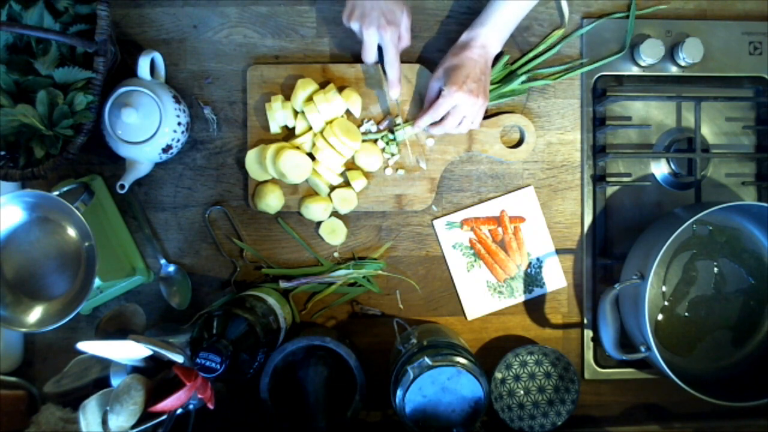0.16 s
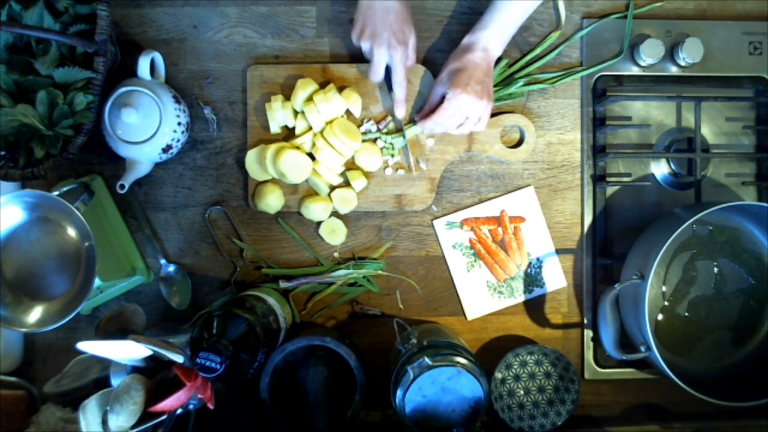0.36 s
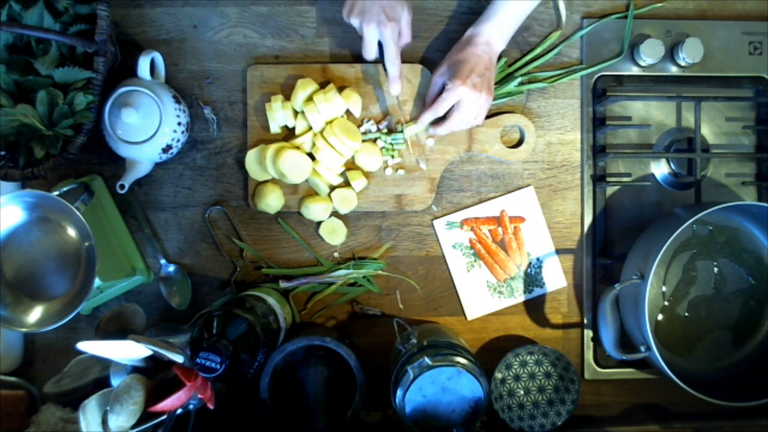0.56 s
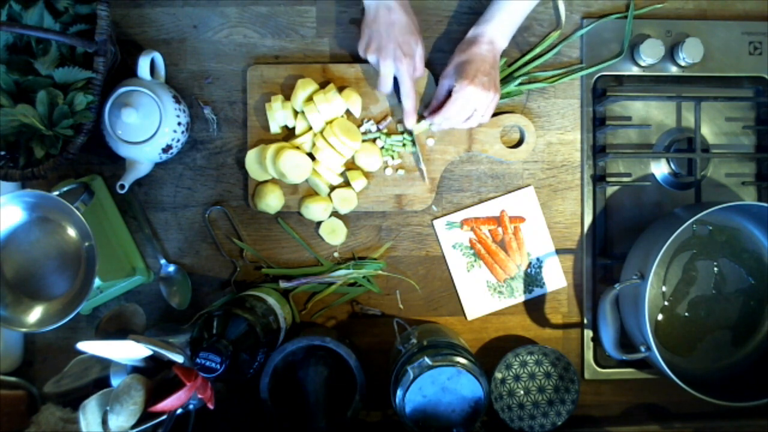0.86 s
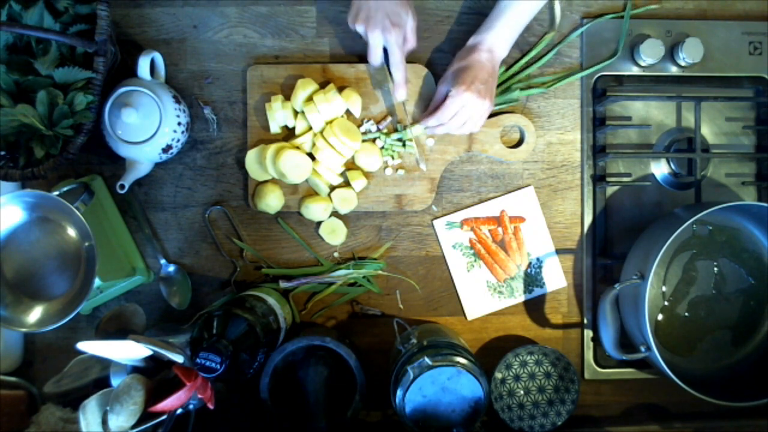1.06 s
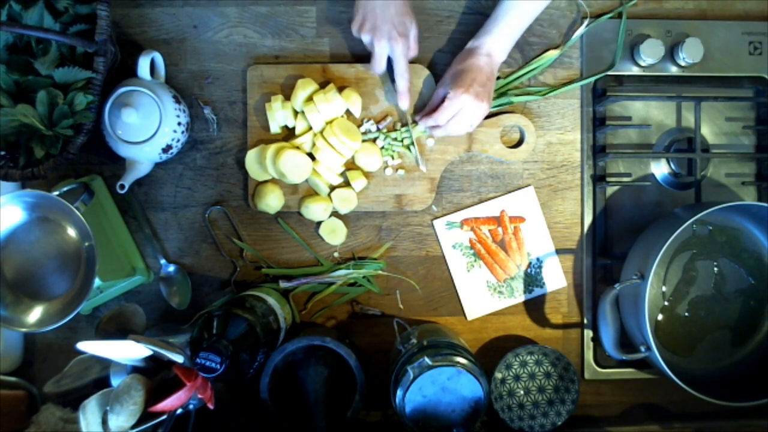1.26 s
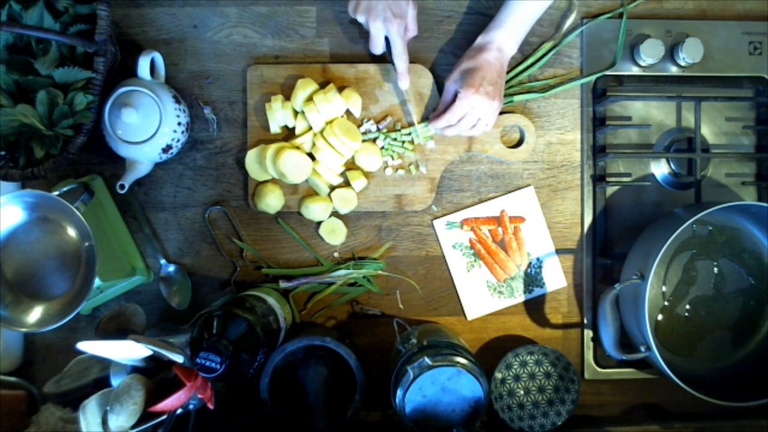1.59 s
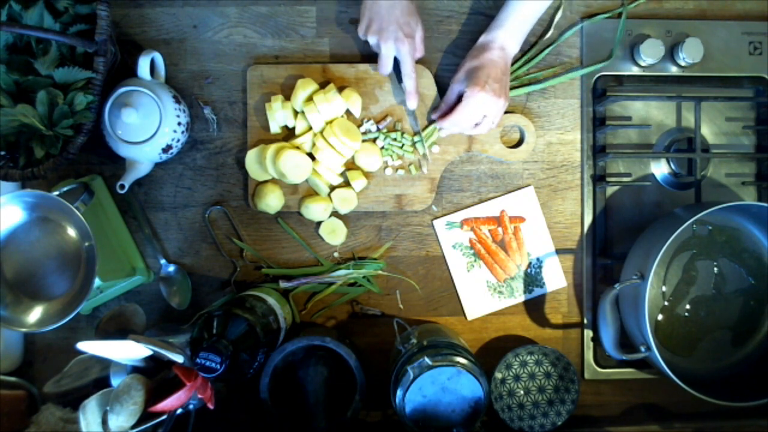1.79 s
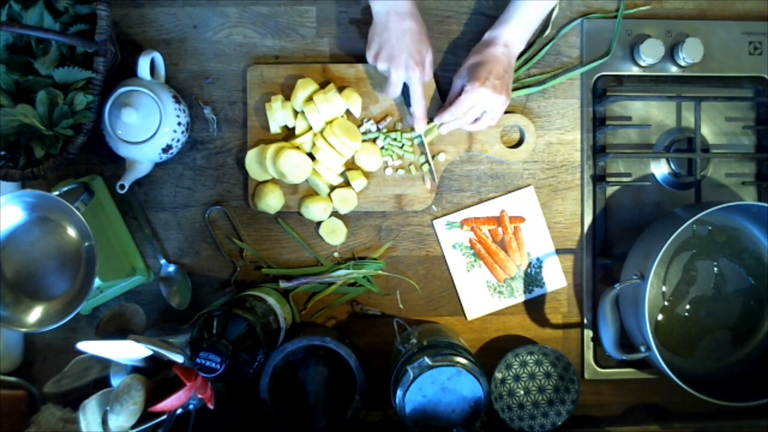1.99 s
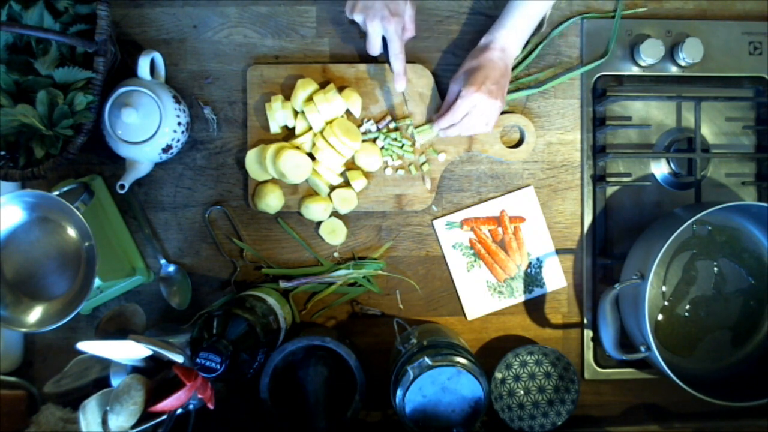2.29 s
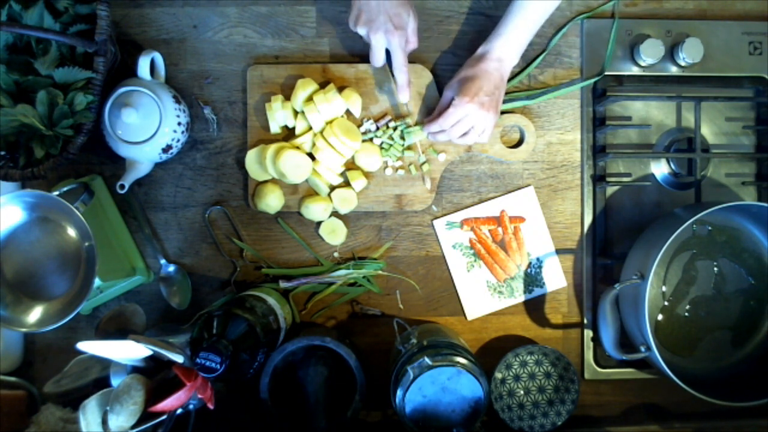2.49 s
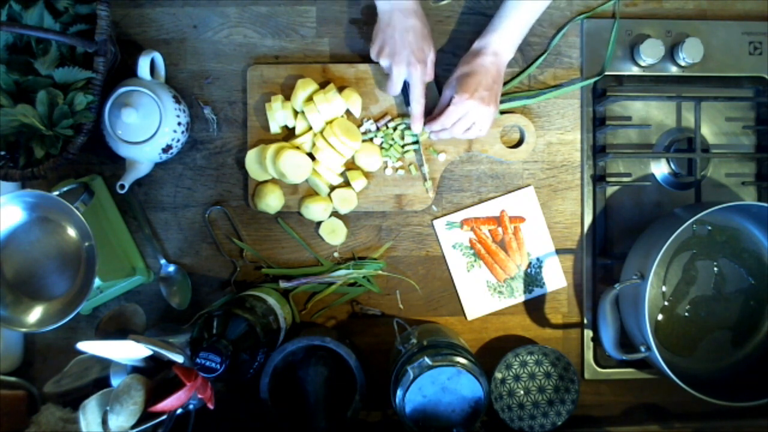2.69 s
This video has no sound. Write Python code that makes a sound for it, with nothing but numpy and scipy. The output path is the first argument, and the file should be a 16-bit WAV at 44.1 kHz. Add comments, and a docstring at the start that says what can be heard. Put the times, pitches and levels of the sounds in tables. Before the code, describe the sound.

Knife slicing through fresh green stalks on a wooden cutting board, knocking early, lighter crunches later

```python
"""A kitchen knife cuts through garlic greens on a wooden board: bursts of tiny clicks crunch, snap and squash.
The first three strokes end in a loud knock, an impulse through the board's tones; the later ones are light.
Once, between strokes, the blade pings in steel modes; it also slides with faint gliding notes.
Twice, before the ping and again near the end, its edge drags over the wood in grainy scrapes and squeaks.
The place is small and hard-walled, with more room than direct sound, over filtered noise, hum and whine."""
import sys
import numpy as np
from scipy import signal
from scipy.fft import rfft, irfft
from scipy.io import wavfile
from scipy.ndimage import uniform_filter1d

SR = 44100
rng = np.random.default_rng(int(sys.argv[2]) if len(sys.argv) > 2 else 0)


def unload_wav(signal):
    """Save mono or channel-first audio to the path in sys.argv[1] as 16-bit WAV at rate SR, clipped to [-1, 1]."""
    wavfile.write(
        sys.argv[1],
        SR,
        np.round(np.clip(np.atleast_2d(signal).T, -1, 1) * 32767).astype(np.int16),
    )


N = 125685  # samples


def amp(db):
    """Decibels to gain."""
    return 10 ** (np.asarray(db) / 20)


def unit(x):
    """Scales to an energy of one."""
    return x / np.sqrt(np.sum(x ** 2) + 1e-20)


def read(points, hz):
    """Reads a table on a log-frequency axis."""
    f, value = np.transpose(points)
    return np.interp(np.log(hz + 1), np.log(f + 1), value)


def add(mix, start_s, sound):
    """Mixes a sound in at a time, cut off at the end of the mix."""
    part = mix[max(round(start_s * SR), 0):][:len(sound)]
    part += sound[:len(part)]


def through(x, response):
    """Convolves, keeping the length."""
    return signal.fftconvolve(x, response)[:len(x)]


def swell(t, rise_s):
    """Smooth start from zero to one."""
    return np.sin(np.pi / 2 * np.minimum(t / rise_s, 1)) ** 2


def colour(points, size=4096):
    """Causal minimum-phase filter of unit energy with the given spectrum."""
    hz = abs(np.fft.fftfreq(size, 1 / SR))
    log_gain = np.log(amp(read(points, hz)))
    spectrum = np.exp(np.conj(signal.hilbert(log_gain)))
    return unit(np.fft.ifft(spectrum).real[:size // 2])


def modes(table):
    """Dying sines of a struck object, in alternating sign."""
    t = np.arange(SR // 2) / SR
    total = np.zeros(len(t))
    for k, (hz, db, t60) in enumerate(table):
        total += (-1) ** k * amp(db - 60 * t / t60) * np.sin(2 * np.pi * hz * t)
    return unit(total)


def blows(rows):
    """One impulse per (start_s, level_db), scaled as if a unit-energy response filled 40 ms."""
    out = np.zeros(N)
    for start_s, db in rows:
        add(out, start_s, amp([db]) * np.sqrt(.04 * SR))
    return out


FIBRE_RATE_PER_S, FIBRE_SIZE_DB = 2500, 4.5  # size: scale of the uneven click levels
BITE_SHARE, RELEASE_S = 0.16, .004  # rise as a share of the length; decay time constant


def grains(rows):
    """Bursts of tiny clicks of uneven size, one burst per (start_s, length_s, level_db)."""
    t, out = np.arange(SR // 6) / SR, np.zeros(N)
    for start_s, length, db in rows:
        chance, size, sign = rng.random((3, len(t)))
        size_gain = amp(-FIBRE_SIZE_DB * np.log(size + np.exp(-4)))
        clicks = (chance < FIBRE_RATE_PER_S / SR) * np.sign(sign - .5) * size_gain
        bite = np.minimum(t / (BITE_SHARE * length), 1)
        release = np.exp(-np.maximum(t - length, 0) / RELEASE_S)
        add(out, start_s, amp(db) * np.sqrt(length * SR) * unit(clicks * bite * release))
    return out


# hiss colour: frequency_hz, relative density_db (per Hz)
HISS_COLOUR = [(25, 7), (60, 4.5), (120, -11), (300, -3.5), (1000, -9.5), (2400, -12), (4000, -11.5),
               (7000, -15), (14000, -27.5)]
HISS_DB = -70.5  # before the low cut and band limit
# mains hum and thin electrical whine, before the low cut: pitch_hz, level_db
HUM_TONES = [(50, -64), (1260, -88), (3325, -77.5), (4673, -86.5), (8000, -82), (11326, -87.5),
             (12672, -91.5), (13291, -92.5)]


def background():
    """Steady floor at the microphone: coloured noise as faint hiss, sines as hum and whine."""
    t = np.arange(N) / SR
    tones = np.zeros(N)
    for hz, db in HUM_TONES:
        tones += amp(db) * np.sqrt(2) * np.sin(2 * np.pi * (hz * t + rng.random()))
    hiss = through(rng.standard_normal(N), colour(HISS_COLOUR))
    return tones + amp(HISS_DB) * hiss


# decay of the room, before its spectrum is evened and its end faded: frequency_hz, t60_s
ROOM_DECAY = [(100, 0.27), (400, 0.2), (1000, 0.29), (2000, 0.28), (3200, 0.28), (7000, 0.2), (14000, 0.28)]
EARLY_S, EARLY_LIFT_DB, EARLY_STEP_DB = .041, 3, 5  # gain rises through the early echoes, then drops
DIRECT_DB = -8  # direct sound against the whole of the echoes


def room():
    """Direct sound, an even cluster of early echoes, and a weaker tail that dies band by band."""
    t = np.arange(SR // 2) / SR
    hz, at, noise = signal.stft(rng.standard_normal(len(t)), SR, nperseg=256)
    decay = amp(-60 * at / read(ROOM_DECAY, hz)[:, None])
    echoes = signal.istft(noise * decay, SR, nperseg=256)[1][:len(t)]
    step = amp(np.where(t < EARLY_S, EARLY_LIFT_DB * t / EARLY_S, EARLY_LIFT_DB - EARLY_STEP_DB))
    fade = np.clip((.35 - t) * 8, 0, 1)  # silent from 0.35 s
    for _ in range(3):  # even out the spectrum
        power = uniform_filter1d(abs(rfft(echoes * step)) ** 2, size=24)
        echoes = irfft(rfft(echoes) / np.sqrt(power), len(t)) * fade
    return unit(unit(echoes * step) + amp(DIRECT_DB) * (t == 0))


# flat of the blade slides lightly, before the room: start_s, length_s, start_hz, end_hz, level_db
STEEL_SLIDES = [(0.484, 0.046, 3910, 3607, -70.5), (1.345, 0.083, 3960, 3820, -64),
                (2.198, 0.086, 3930, 3440, -67)]
SLIDE_WAVER_HZ = 110  # rms


def slides(space):
    """Sliding steel sings a faint falling note whose pitch wavers at random."""
    out = np.zeros(N)
    for start_s, length, start_hz, end_hz, db in STEEL_SLIDES:
        u = np.minimum(np.arange(SR // 6) / SR / length, 1)  # progress, 0 to 1
        slow_noise = uniform_filter1d(rng.standard_normal(len(u)), size=100)
        waver = unit(slow_noise) * np.sqrt(len(u))
        pitch_hz = start_hz + (end_hz - start_hz) * u + SLIDE_WAVER_HZ * waver
        turns = np.cumsum(pitch_hz) / SR
        envelope = np.sin(np.pi * np.sqrt(u))
        add(out, start_s, 2 * amp(db) * envelope * np.sin(2 * np.pi * turns))
    return through(out, space)


# blade is touched and rings: start_s, level_db (of the direct ring)
BLADE_PINGS = [(2.3155, -37)]
# modes of the blade: pitch_hz, relative level_db, t60_s
BLADE_MODES = [(1163, -27, .2), (1655, -22, .28), (2192, -8, .26), (2695, -11, .17), (2955, -7, .14),
               (3140, -14, .22), (3650, -11, .12), (4005, -4, .14), (4054, -5, .14), (4150, 1, .28),
               (4283, -1, .15), (4466, -7, .14), (4750, -14, .12), (6153, -19, .2), (7260, -23, .17)]
PING_RISE_S, PING_ROOM_DB = .002, 1  # room level against the direct ring
PING_FIRST_SHARE = .06  # share of each mode's t60 that feeds the room


def blade(space):
    """A touch on the steel: the blade rings in its modes, and its first moment fills the room."""
    rise = swell(np.arange(len(space)) / SR, PING_RISE_S)
    first = rise * modes([(hz, db, t60 * PING_FIRST_SHARE) for hz, db, t60 in BLADE_MODES])
    direct = unit(rise * modes(BLADE_MODES))
    in_room = unit(through(first, space))
    return through(blows(BLADE_PINGS), direct + amp(PING_ROOM_DB) * in_room)


# blade drags over the wood: start_s, length_s, scrape_db, squeak_db
WOOD_DRAGS = [(1.855, 0.086, -85, -59), (1.927, 0.041, -54, -43.5), (1.956, 0.017, -61, -38.5),
              (2.002, 0.03, -43, -42), (2.658, 0.046, -43, -68), (2.687, 0.059, -38, -41),
              (2.77, 0.075, -48.5, -70), (2.82, 0.052, -39.5, -61)]
# colour of the scrape: frequency_hz, relative level_db
SCRAPE_COLOUR = [(60, -56), (300, -34), (480, -5), (680, 8), (900, -5), (1300, 2.5), (1900, -3.5),
                 (2800, -0.5), (4000, -11.5), (6000, -17), (9000, -27), (14000, -44)]
# colour of the squeak: frequency_hz, relative level_db
SQUEAK_COLOUR = [(60, -42.5), (500, -34), (900, -11.5), (1080, 12), (1200, -6), (1330, 6.5), (1700, -26),
                 (2100, -31), (3500, -8.5), (14000, -40.5)]


def drags(space):
    """The edge sticks and slips over the wood: grainy clicks, coloured as scrape and dull squeak."""
    scrape = grains([(s, length, db) for s, length, db, _ in WOOD_DRAGS])
    squeak = grains([(s, length, db) for s, length, _, db in WOOD_DRAGS])
    dragged = through(scrape, colour(SCRAPE_COLOUR)) + through(squeak, colour(SQUEAK_COLOUR))
    return through(dragged, space)


# broad resonances of the board, before the room: pitch_hz, relative level_db, t60_s
BOARD_MODES = [(165, -24.5, 0.024), (313, -19.5, 0.016), (396, -14, 0.017), (427, -7.5, 0.012),
               (659.7, -3.5, 0.029), (872, -10, 0.049), (1060, 1.5, 0.014), (1380, 1, 0.015),
               (1503, -7.5, 0.048), (1683, -2.5, 0.0087), (2027, -7, 0.037), (2220, -14, 0.036),
               (2600, -22, .025)]
# colour of the blade's contact with the wood: frequency_hz, relative level_db
CONTACT_COLOUR = [(40, -30), (120, -12.5), (250, 8), (500, 5.5), (1000, 6.5), (2100, 1.5), (2600, -4),
                  (4500, -14.5), (14000, -65)]
# lasting ring of board and counter: pitch_hz, relative level_db
RING_TONES = [(370, -13), (450, -7), (606, -6), (634, -5), (668, 0), (713, -4), (862, -8), (950, -6),
              (1027, -2), (1078, -1), (1135, -5), (1220, -1), (1274, -3), (1304, -4), (1354, -3),
              (1390, -8), (1431, -7), (1514, -8), (1749, -8), (1879, -7), (2008, -4), (2085, -6),
              (2246, -11)]
RING_DB, RING_RISE_S, RING_T60_S = -6, 0.001, .215  # level against the clack


def board(space):
    """The board's answer to one blow: a woody clack in the room and a cluster of longer tones."""
    t = np.arange(len(space)) / SR
    clack = unit(through(through(space, modes(BOARD_MODES)), colour(CONTACT_COLOUR)))
    ring = np.zeros(len(t))
    for hz, db in RING_TONES:
        ring += amp(db) * np.sin(2 * np.pi * (hz * t + rng.random()))
    ring = unit(ring * swell(t, RING_RISE_S) * amp(-60 * t / RING_T60_S))
    return unit(clack + amp(RING_DB) * ring)


# blade lands on the board: start_s, wood_db, edge_click_db, dry_crack_db
BOARD_KNOCKS = [(.2302, -9.5, -30.5, -17.5), (.6732, -15, -34, -33), (1.162, -16.5, -39.5, -25)]
# colour of edge click and crack: frequency_hz, relative level_db
CLICK_COLOUR = [(60, -16), (300, -1.5), (1500, -21), (2700, 18.5), (3900, 14), (5000, -1), (8000, 2.5),
                (14000, -23.5)]
CRACK_S = .003


def knocks(space, wood):
    """The edge strikes the board with a dry crack; the click and the wood carry into the room."""
    thud = blows([(s, db) for s, db, _, _ in BOARD_KNOCKS])
    click = blows([(s, db) for s, _, db, _ in BOARD_KNOCKS])
    crack = grains([(s, CRACK_S, db) for s, _, _, db in BOARD_KNOCKS])
    edge = through(click, space) + crack
    return through(thud, wood) + through(edge, colour(CLICK_COLOUR))


# blade crushes stalks: start_s, length_s, crunch_db, skin_snap_db, low_squash_db, board_ring_db
STALK_CUTS = [(0.114, 0.0067, -48, -39, -46, -44.5), (0.147, 0.02, -39.5, -38.5, -36.5, -35),
              (0.196, 0.047, -31.5, -32, -33.5, -35.5), (0.592, .013, -36, -39, -57, -37),
              (0.601, 0.041, -32.5, -33, -30.5, -35), (0.666, 0.015, -40, -27.5, -26, -49),
              (1.033, .012, -70, -61.5, -84.5, -79), (1.087, 0.078, -29.5, -30.5, -34, -34.5),
              (1.158, 0.0042, -34, -48, -49, -47), (1.258, 0.0054, -47, -40.5, -39, -54),
              (1.497, .02, -67, -63.5, -63, -82), (1.54, 0.026, -47.5, -42.5, -48, -50),
              (1.558, 0.02, -31.5, -27.5, -32.5, -32.5), (1.739, 0.022, -46, -47, -47, -41.5),
              (1.759, 0.014, -32.5, -31, -29, -39), (1.789, 0.039, -48, -50, -44.5, -43.5),
              (1.956, .012, -41.5, -37, -60, -51.5), (1.99, 0.016, -35.5, -36.5, -73, -44),
              (2.414, 0.024, -67, -59.5, -76, -89.5), (2.481, .035, -35.5, -34.5, -62, -47.5),
              (2.52, 0.02, -26.5, -24, -29.5, -23.5), (2.559, 0.073, -46.5, -46.5, -70, -79),
              (2.671, 0.015, -38, -34, -59, -54)]
# colour of the crunch: frequency_hz, relative level_db
CRUNCH_COLOUR = [(60, -36), (400, -24.5), (1000, -1), (1650, -28.5), (2200, 2.5), (3300, -1.5),
                 (4300, -2.5), (6000, -8), (14000, -57.5)]
# colour of the fine snap of the skin: frequency_hz, relative level_db
SNAP_COLOUR = [(60, -61), (1000, -33.5), (3000, -10), (4300, -0.5), (5700, 2), (7500, -1.5), (9000, -8.5),
               (11000, -17), (14000, -35)]
# colour of the low squash: frequency_hz, relative level_db
SQUASH_COLOUR = [(40, -53.5), (100, -39), (180, -16), (300, -12), (420, 5.5), (700, -5), (1200, -6.5),
                 (3000, -20), (14000, -59)]


def cuts(space, wood):
    """Fibres crunch and snap, the stalks squash, and the jolts ring the board."""
    layers = []
    for k in range(4):
        layers.append(grains([(s, length, levels[k]) for s, length, *levels in STALK_CUTS]))
    crunch, snap, squash, jolts = layers
    stalks = through(crunch, colour(CRUNCH_COLOUR))
    stalks += through(snap, colour(SNAP_COLOUR))
    stalks += through(squash, colour(SQUASH_COLOUR))
    return through(stalks, space) + through(jolts, wood)


def scene():
    """Knife, greens and board share one room."""
    space = room()
    wood = board(space)
    mix = background() + slides(space) + blade(space) + drags(space)
    mix += knocks(space, wood) + cuts(space, wood)
    return mix[None]


CEILING = 0.6  # full scale is 1
LOW_CUT_HZ, EDGE_HZ = 101, 14500


def record(dry):
    """One microphone channel: peaks round off softly, then a low cut and a band limit."""
    rounded = dry / (1 + (dry / CEILING) ** 4) ** (1 / 4)
    thinned = signal.lfilter(*signal.butter(2, LOW_CUT_HZ, "high", fs=SR), rounded)
    band_limit = signal.firwin(255, EDGE_HZ, window=("kaiser", 9), fs=SR)
    return signal.oaconvolve(thinned, band_limit[None], "same")


dry = scene()
out = record(dry)
unload_wav(out)
```